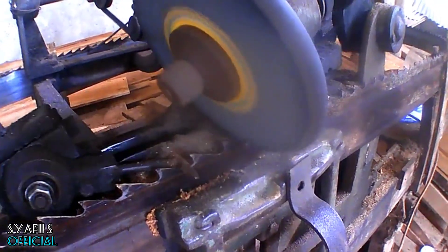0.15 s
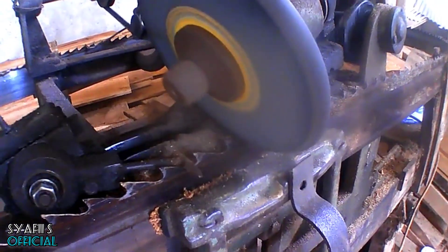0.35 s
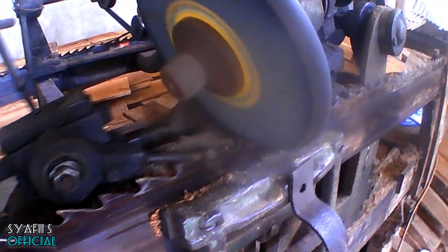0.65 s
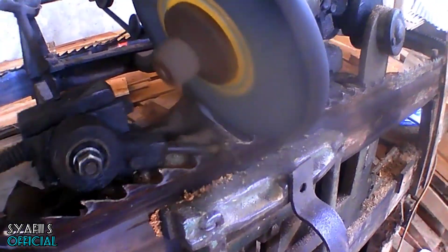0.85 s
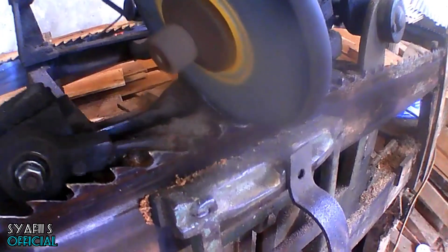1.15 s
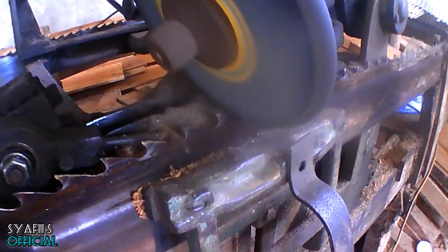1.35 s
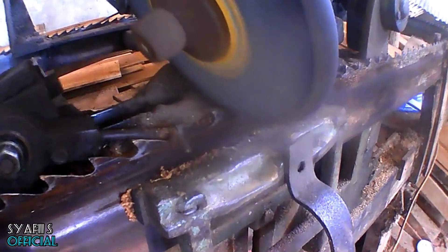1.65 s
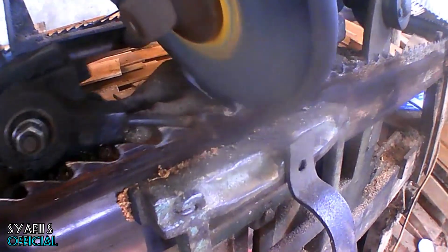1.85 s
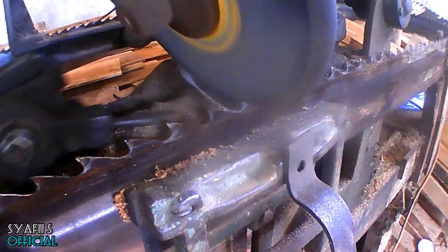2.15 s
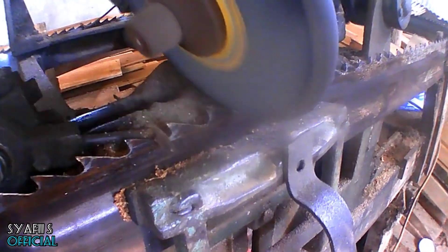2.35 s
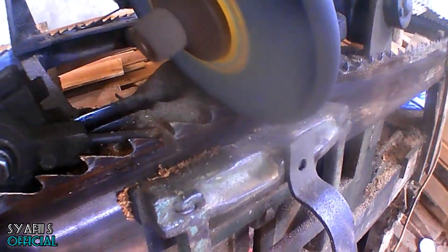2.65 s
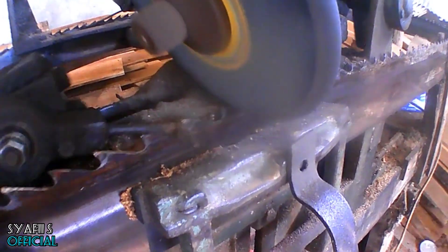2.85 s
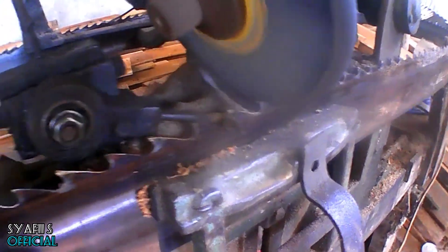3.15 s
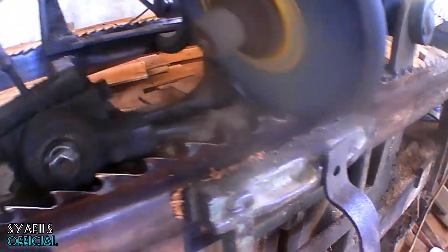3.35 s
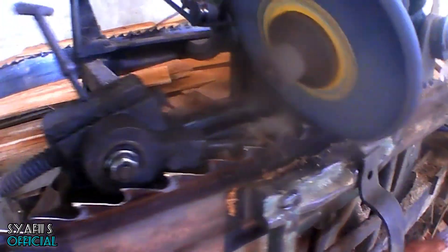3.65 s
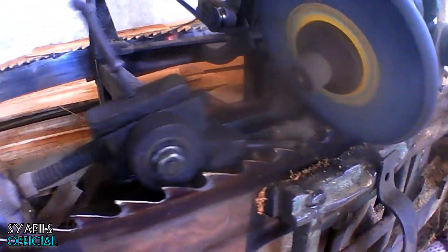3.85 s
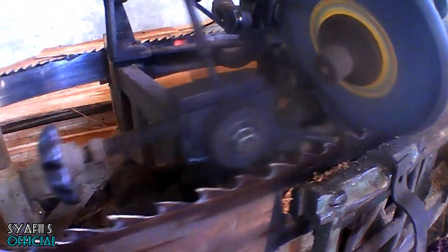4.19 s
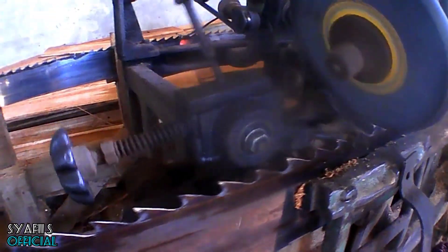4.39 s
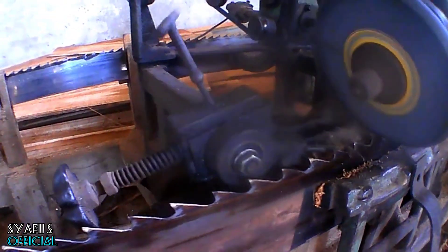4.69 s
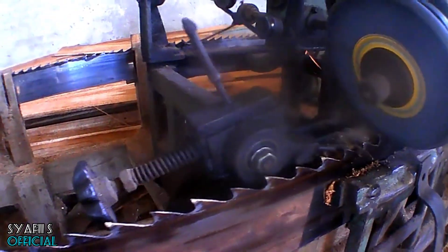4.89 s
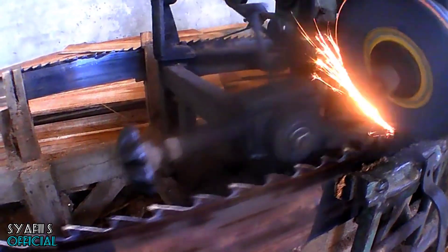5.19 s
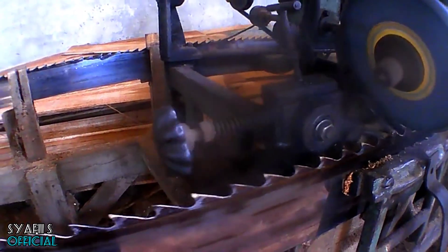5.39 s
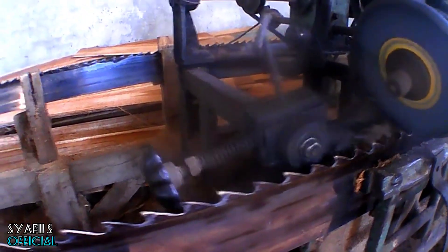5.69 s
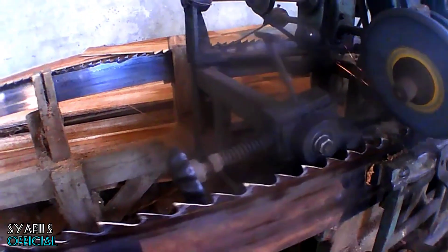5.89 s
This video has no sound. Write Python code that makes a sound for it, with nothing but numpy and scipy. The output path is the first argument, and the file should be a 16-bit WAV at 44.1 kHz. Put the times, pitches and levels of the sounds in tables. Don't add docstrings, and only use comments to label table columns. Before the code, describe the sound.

A close, cheap-sounding microphone with dull top end catches a blade sharpening machine in a roaring mill hall. An abrasive wheel rasps against a steel band almost at once, fluttering and ringing, then lifts. A light double graze comes before the second rasp; after a longer gap a third follows, then a short sharp dab. Regular bright scuffs mark the blade being pushed forward, a loose linkage ticks, and a far saw's whine gradually drops behind.

```python
import sys
import numpy as np
from scipy import signal
from scipy.fft import rfft, irfft, next_fast_len
from scipy.io import wavfile
from scipy.ndimage import uniform_filter1d, map_coordinates

SR = 44100
rng = np.random.default_rng(int(sys.argv[2]) if len(sys.argv) > 2 else 0)


def elevation(decibels):
    levels = np.asarray(decibels, float)
    return 10 ** (levels / 20)


def to_wav(s):
    ch = np.atleast_2d(s).T
    pcm = np.round(np.clip(ch, -1, 1) * 32767)
    wavfile.write(sys.argv[1], SR, pcm.astype(np.int16))


N = 265923

# (high spot first leaves it t/s, bite lead before that t/s, bite level/dB, soft edge t/s)
PASSES = [
    (.29, .0055, 14, 0.0032),
    (2.526, .005, 10, 0.0039),
    (4.812, 0.0044, 14, 0.0049),
    (5.371, 0.0069, 0, 0.0042),
]
TURN_S = [.0356, .0379, .0398, .036]
# (t/s, pressure level/dB, brightness level/dB)
FEED = [
    [(.27, -48, 11), (.32, -26, -1.5), (.39, -28.5, 1), (.46, -34, 1.5), (.5, -33, -2), (.53, -38, -8)],
    [(2.504, -28.5, 4.5), (2.59, -26, 2.5), (2.67, -27.5, 1.5), (2.71, -26.5, -3.5), (2.79, -27.5, -1.5),
     (2.83, -32, -4.5), (2.86, -31.5, -2), (2.91, -36, -12.5)],
    [(4.795, -33.5, 2), (4.85, -28, 2), (4.89, -29, 1.5), (4.93, -26, 4.5), (4.97, -28.5, -4),
     (5.01, -31, 1), (5.09, -32, -0.5), (5.13, -34.5, -4), (5.19, -31, 2)],
    [(5.347, -33.5, 2.5), (5.365, -31, 3), (5.39, -27, 3), (5.43, -43.5, 0), (5.48, -42.5, -8.5)],
]
# (middle t/s, length t/s, body rise level/dB, hiss rise level/dB, slide level/dB)
SHOVES = [(0.475, 0.089, 3, 2.5, -53), (1.19, 0.094, 4.5, 4.5, -41), (2.02, 0.093, 2.5, 1, -48),
          (2.9, 0.14, 0, 2, -47), (3.711, 0.11, 5, 3.5, -39), (4.398, 0.07, 2, 5.5, -39),
          (5.175, 0.054, 1, 0, -54), (5.43, 0.11, 3, 5.5, -46)]


def unit(x):
    return x / np.sqrt(np.mean(np.abs(x) ** 2) + 1e-20)


def along(points, hz):
    f, v = np.transpose(points)
    return np.interp(np.log(hz + 1), np.log(f + 1), v)


def curves(rows, **outside):
    s, *cols = np.transpose(rows)
    t = np.arange(N) / SR
    return [np.interp(t, s, c, **outside) for c in cols]


def wobble(rate):
    knots = rng.standard_normal(int(N * 40 / SR))
    return map_coordinates(knots, [np.arange(N) * min(rate, 30) / SR])


def filtered(x, response):
    m = next_fast_len(N + SR // 2)
    return irfft(rfft(x, m) * response(np.fft.rfftfreq(m, 1 / SR)), m)[..., :N]


def rush(spectrum, patchy_db):
    z = signal.stft(rng.standard_normal(N + 512), nperseg=512)[2]
    field = uniform_filter1d(rng.standard_normal(z.shape), size=5, axis=0)
    field = uniform_filter1d(field, size=12, axis=1)
    noise = signal.istft(z * elevation(patchy_db * unit(field)), nperseg=512)[1][:N]
    return unit(filtered(noise, lambda hz: elevation(along(spectrum, hz))))


def grinding(scratch_db, damping_hz, low_hz):
    total = np.zeros(N)
    for k in range(len(PASSES)):
        grains = grit(TURN_S[k], worn=.3, spiky_db=2.5, chatter_db=1.4)
        pressure, zone_db = contact(k)
        force = grains * pressure + bites(k, zone_db, gain_db=13)
        rung = filtered(force, lambda f: steel(k, f, scratch_db, damping_hz, low_hz))
        total += rung.sum(axis=0)
    return total


def grit(turn_s, worn, spiky_db, chatter_db):
    fresh, face = rng.standard_normal((2, N)) * elevation(spiky_db * rng.standard_normal((2, N)))
    one_turn = face[:round(turn_s * SR)]
    grains = np.sqrt(1 - worn) * fresh + np.sqrt(worn) * np.resize(one_turn, N)
    grains *= elevation(chatter_db * unit(uniform_filter1d(rng.standard_normal(N), size=90)))
    return grains / np.sqrt(np.abs(uniform_filter1d(grains ** 2, size=400)))


def contact(k):
    zone_balance = [(-8, -9, -20), (-7, -3.5, -16), (-8, -10.5, -15), (-6.5, -5, -8)]
    bright_grows = [0.98, 1.2, .9]
    contact_share = [(.38, .48), (.82, .16), (.85, .55), (.85, .5)]
    drag_db = [-14, -14, -7, -8]
    t = np.arange(N) / SR
    feed_db, bright_db = curves(FEED[k])
    zone_db = feed_db + np.append(0, zone_balance[k])[:, None]
    zone_db = zone_db + np.outer(np.append(0, bright_grows), bright_db)
    first_s, last_s = FEED[k][0][0], FEED[k][-1][0]
    leaves_s, _, _, edge_s = PASSES[k]
    until_off = ((leaves_s - t) / TURN_S[k]) % 1
    lifted = until_off > np.interp(t, [first_s, last_s], contact_share[k])
    pressure = elevation(zone_db + drag_db[k] * lifted) * (t > first_s) * (t < last_s)
    return np.abs(uniform_filter1d(pressure, max(int(edge_s * SR), 1), axis=1)), zone_db


def bites(k, zone_db, gain_db):
    bite_zone_db = [-9.5, -9, -7.5]
    # (t/s, peak level/dB)
    grazes = [
        (1.979, -14.5),
        (1.997, -18),
    ]
    first_s, lead_s, bite_db = PASSES[k][:3]
    at = np.round(np.arange(first_s - lead_s, FEED[k][-1][0], TURN_S[k]) * SR).astype(int)
    push = np.zeros((4, N))
    scatter_db = 1.5 * rng.standard_normal(16)[:len(at)]
    size_db = gain_db + bite_db + scatter_db
    push[:, at] = elevation(zone_db[:, at] + size_db + np.append(0, bite_zone_db)[:, None])
    if k == 1:
        for s, db in grazes:
            push[:, round(s * SR)] = elevation(gain_db + db + np.array([0, -20, -21, -45]))
    return push


def steel(k, f, scratch_db, damping_hz, low_hz):
    # (f/Hz, width f/Hz, level/dB)
    blade_1 = [(1673, 55, -2), (2400, 32, -7.5), (2710, 34, -12.5), (3070, 75, -9), (3500, 110, -20.5),
               (4260, 46, -8.5), (4460, 20, -16.5), (4690, 66, -23.5), (5200, 43, -21.5), (5450, 44, -22.5),
               (6070, 46, -27), (6430, 24, -31)]
    blade_2 = [(1593, 61, -9.5), (1896, 36, -4.5), (2620, 22, -7), (2690, 69, -13.5), (3030, 28, -13.5),
               (3520, 51, -10.5), (4076, 120, -6.5), (5000, 110, -18), (5360, 250, -20), (6540, 200, -26),
               (7000, 46, -35.5)]
    blade_3 = [(1630, 26, 4.5), (1925, 41, 1), (2480, 35, -4), (2540, 50, -13.5), (3030, 140, -11.5),
               (3000, 69, -14.5), (3680, 90, -19), (3680, 91, -23), (4040, 110, -17.5), (4700, 100, -10),
               (4860, 31, -22), (5150, 120, -16.5), (6200, 87, -21), (7400, 44, -27)]
    blade_4 = [(1690, 50, 5.5), (1900, 23, -2), (2050, 15, -10.5), (2550, 22, 5), (3330, 43, -18),
               (3850, 36, 0.5), (4670, 19, -9), (5270, 44, -19.5), (5460, 26, -14.5), (5880, 37, -8),
               (6400, 130, -19)]
    # (f/Hz, level/dB per Hz)
    scratch = [
        [(850, -42), (1450, -24), (1640, 4.5), (2250, -17.5), (2340, -10), (3240, -29), (4220, -14),
         (7080, -35), (9200, -71), (15600, -120)],
        [(850, -35.5), (1450, -23), (1640, -9), (2230, -12), (3010, -16), (3300, -20), (4140, -7),
         (4570, -22.5), (7080, -36.5), (9200, -69.5), (15600, -120)],
        [(850, -43), (1450, -16.5), (1660, 2), (2190, -14), (2370, -13.5), (3300, -18.5), (4660, -12),
         (6450, -34), (7080, -27.5), (9200, -72), (15600, -120)],
        [(850, -34), (1450, 0), (2430, -9), (3320, -13), (4030, -0.5), (4980, -23), (6200, -7), (7080, -21.5),
         (9200, -50), (15600, -120)],
    ]
    ring = 0
    for m, (centre, width, db) in enumerate([blade_1, blade_2, blade_3, blade_4][k]):
        damped = 1j * f * (width + damping_hz)
        ring = ring + (-1) ** m * elevation(db) * damped / (centre * centre - f * f + damped)
    thin = 1 / np.sqrt(1 + (low_hz / (f + 1)) ** 12)
    parts = (ring * thin + elevation(scratch_db + along(scratch[k], f))) * zones(f)
    return parts / np.sqrt(np.mean(np.abs(parts) ** 2, axis=1, keepdims=True))


def zones(hz):
    borders = [2200, 3300, 4900]
    above = [np.clip(.5 + 4 * np.log2((hz + 1) / edge), 0, 1) for edge in borders]
    return np.sqrt(np.abs(-np.diff([np.ones_like(hz), *above, np.zeros_like(hz)], axis=0)))


def ticks():
    # (t/s, peak level/dB, f/Hz)
    clicks = [
        (0.154, -34.5, 5260),
        (2.465, -43.5, 4500),
        (4.573, -30, 3820),
        (4.779, -37, 6170),
    ]
    out, t = np.zeros(N), np.arange(SR // 50) / SR
    for s, db, hz in clicks:
        rough = 1 + 0.76 * rng.standard_normal(len(t))
        out[round(s * SR):][:len(t)] += elevation(db - 60 * t / .015) * np.sin(2 * np.pi * hz * t) * rough
    return out


def slide():
    # (f/Hz, level/dB per Hz)
    scuff = [(2800, -63), (3400, -5.5), (3800, 5.5), (4200, -5), (4600, -13.5), (6000, -62)]
    t = np.arange(N) / SR
    stroke = sum(elevation(db) * np.exp(-(2 * (t - s) / length) ** 2) for s, length, *_, db in SHOVES)
    return stroke * elevation(3.6 * wobble(28)) * rush(scuff, patchy_db=4.5)


def mill():
    # (f/Hz, level/dB per Hz)
    body = [(470, -19.5), (800, -17.5), (914, -9.5), (977, -7), (1120, -5.5), (1220, -0.5), (1290, -4),
            (1520, -4.5), (1640, 0.5), (1850, 2.5), (1980, -2.5), (2190, -11), (2500, -10), (3250, -50.5),
            (5500, -120)]
    hiss = [(1240, -33), (2100, 0.5), (2190, -13), (2460, -16.5), (2640, 0), (2810, -0.5), (3030, -2),
            (3490, -1.5), (4050, 0.5), (4500, -7.5), (4910, -14), (5380, -11), (5840, -15), (6430, -13.5),
            (7080, -23.5), (9200, -57), (15600, -120)]
    rumble = [(12, -51), (20, -5.5), (48, -0.5), (82, -10.5), (129, -3), (165, -11.5), (201, -2.5),
              (241, -7), (270, -6), (345, -4), (381, 0.5), (413, -2.5), (573, 1), (822, 0), (1000, -15.5),
              (1300, -22), (2200, -120)]
    # (f/Hz, level/dB)
    motor_tones = [
        (53.8, -72),
        (269.2, -63.5),
        (309, -63.5),
        (579, -64.5),
    ]
    # (t/s, level/dB)
    load = [(0, 1), (.3, 1.5), (.9, .5), (1.5, -.5), (2.5, 2), (2.85, 2), (3.05, -1.5), (4.4, 0.5),
            (4.8, -1), (5.05, 3), (5.5, -0.5), (5.75, -1.5), (6.03, -0.5)]
    load_db, = curves(load)
    t = np.arange(N) / SR
    body_db, hiss_db = -37.5 + load_db, -43.5 + 0.65 * load_db
    for s, length, body_rise_db, hiss_rise_db, _ in SHOVES:
        swell = np.exp(-(2 * (t - s) / length) ** 2)
        body_db = body_db + body_rise_db * swell
        hiss_db = hiss_db + hiss_rise_db * swell
    shake = wobble(22)
    roar = elevation(body_db + shake) * rush(body, patchy_db=0.72)
    roar += elevation(hiss_db + 0.52 * shake) * rush(hiss, patchy_db=1.75)
    roar += elevation(-47.5) * rush(rumble, patchy_db=0.75)
    for hz, db in motor_tones:
        level = elevation(db + 2.0 + 4.1 * wobble(3.4))
        roar += level * np.sin(2 * np.pi * hz * t + 1.6 * wobble(7.6))
    return roar


def far_saw():
    # (t/s, f/Hz)
    tooth_rate = [(0, 344), (.2, 341), (.7, 336), (1.4, 327.5), (1.7, 325), (2.1, 323.5), (3, 319.5),
                  (3.5, 317.4), (4.2, 316.5), (5, 315), (5.6, 311.5), (6.03, 311)]
    # (multiple of the tooth rate, level/dB)
    overtones = [(4, -10), (5, -7), (6, -7), (7, -24.5), (8, -13.5), (9, -14.5), (10, -16.5), (11, -14.5),
                 (12, -13.5), (13, -21), (14, -26), (15, -32), (16, -24.5), (17, -27), (18, -26.5),
                 (19, -28.5), (20, -28), (21, -36)]
    # centres [f/Hz], widths [f/Hz], rises [level/dB]
    standing_hz = [1264, 1268.6, 1272, 1277, 1895, 1913, 2701, 3441, 3737, 4090, 4134, 4365, 5490, 5520]
    standing_width = [3, 1.5, 3.5, 4, 4, 13, 16, 10, 4, 40, 10, 30, 44, 16]
    standing_db = [12, 7, 14, 6.5, 10, 9, 7, 9.5, 0.5, 10.5, -1, 9, 11.5, 10]
    hz = curves(tooth_rate)[0]
    turn = 2 * np.pi * np.cumsum(hz) / SR
    grid = np.arange(SR // 5)
    lift_db = sum(db * np.exp(-(2 * (grid - c) / w) ** 2)
                  for c, w, db in zip(standing_hz, standing_width, standing_db))
    whine = np.zeros(N)
    for k, db in overtones:
        level_db = -44 + db + np.interp(k * hz, grid, lift_db) + 4 * wobble(14)
        whine += elevation(level_db) * np.sqrt(2) * np.sin(k * turn + (.5 + .09 * k) * wobble(24))
    return whine


def hall(x):
    # (f/Hz, t/s)
    decay = [
        (300, 0.87),
        (2000, 0.24),
        (7000, 0.15),
    ]
    hz, t, z = signal.stft(rng.standard_normal(SR // 2), SR, nperseg=256)
    tail = signal.istft(z * elevation(-60 * t / along(decay, hz)[:, None]), SR, nperseg=256)[1]
    delayed = np.pad(x, (300, 0))
    return signal.fftconvolve(delayed, tail / np.linalg.norm(tail))[:N]


def scene():
    rasp = grinding(scratch_db=-5, damping_hz=38, low_hz=1480) + ticks()
    return (rasp + elevation(-12.0) * hall(rasp) + mill() + far_saw() + slide())[None]


def low_pass(x):
    return signal.sosfilt(signal.butter(12, 15480, fs=SR, output="sos"), x)


def record(dry):
    rate_hz = 16000
    band_edge = [(7200, -1), (7330, -10), (7400, -38.5), (7600, -42), (7680, -66.5)]  # (Hz, dB)
    image_band = [(8300, -23.5), (8700, -19.0), (8900, -23.0), (9100, -39.0), (9500, -75.5)]  # (Hz, dB)
    dry = dry / (1 + np.abs(dry / .24) ** 4) ** (1 / 4)
    kept = filtered(dry, lambda hz: elevation(along(band_edge, hz)))
    mirror = kept * np.cos(2 * np.pi * rate_hz * np.arange(N) / SR)
    image = filtered(mirror, lambda hz: elevation(along(image_band, hz)) * (hz > rate_hz / 2))
    hiss = elevation(-89.5) * rng.standard_normal(dry.shape)
    return low_pass(kept + image + hiss)


dry = scene()
out = record(dry)
to_wav(out)
```